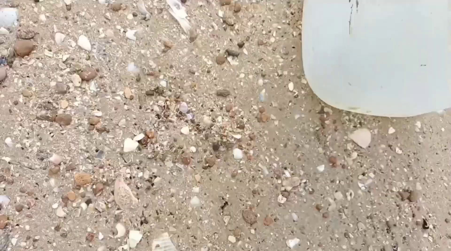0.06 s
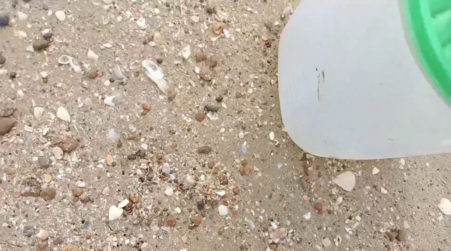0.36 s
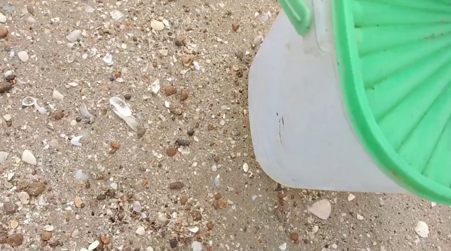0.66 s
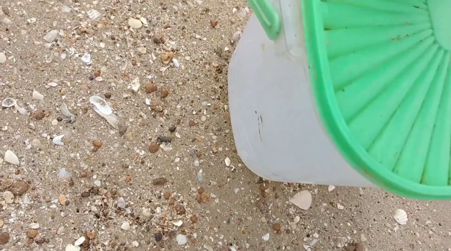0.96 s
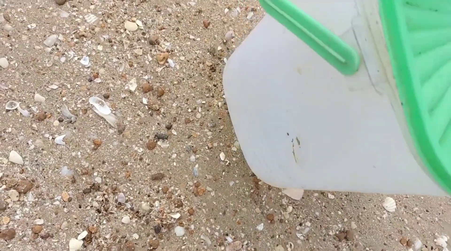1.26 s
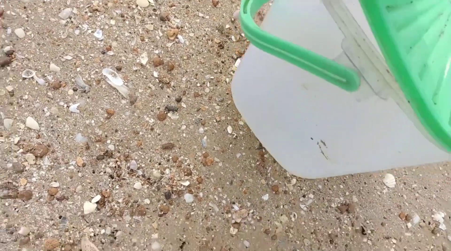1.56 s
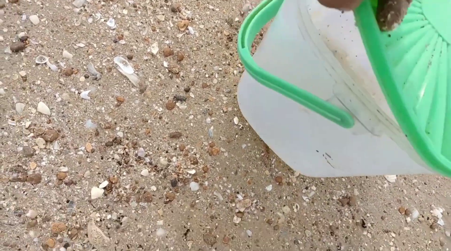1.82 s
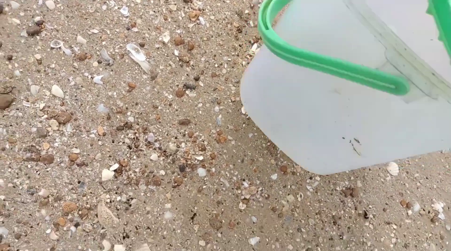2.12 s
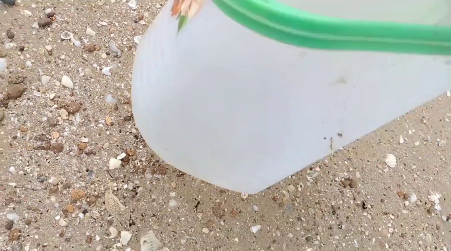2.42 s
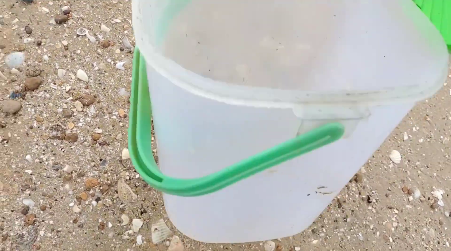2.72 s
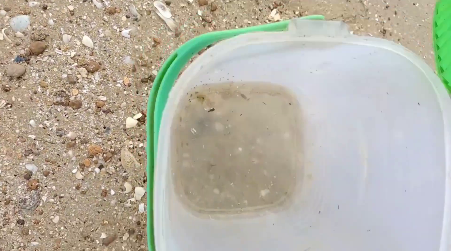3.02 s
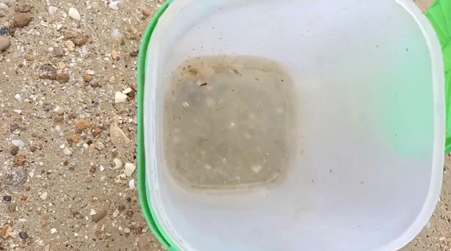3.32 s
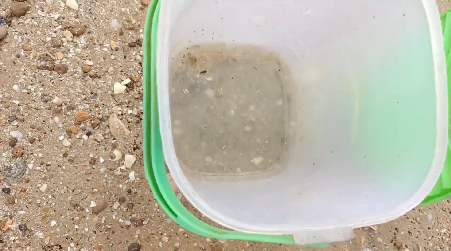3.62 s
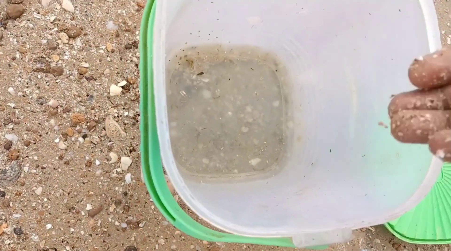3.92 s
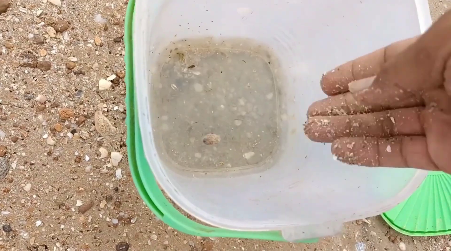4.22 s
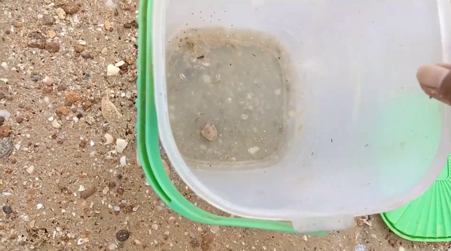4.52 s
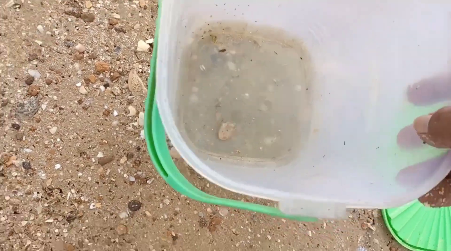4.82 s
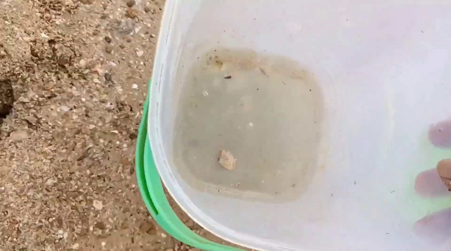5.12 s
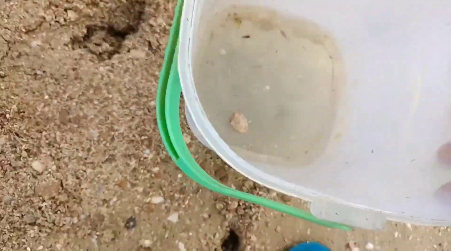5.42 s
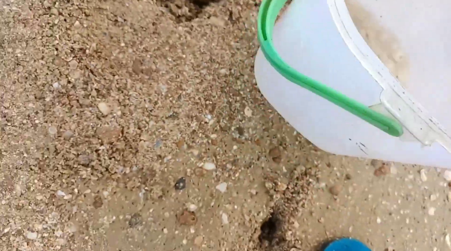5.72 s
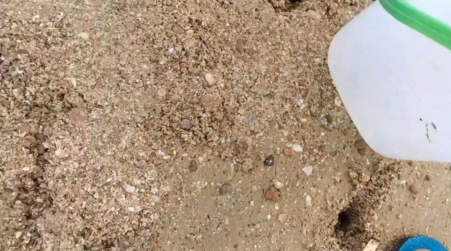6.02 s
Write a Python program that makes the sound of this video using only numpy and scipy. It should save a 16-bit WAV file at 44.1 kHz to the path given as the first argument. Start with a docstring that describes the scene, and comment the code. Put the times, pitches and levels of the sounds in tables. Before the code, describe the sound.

A plastic bucket scrapes and knocks on shell sand as its lid is pulled off and a wet lump plops into shallow water.

```python
"""On a beach of shell sand, a plastic bucket with a little water in it stands close to the microphone.
A sandy hand works the lid loose, drags the bucket over the grit, drops a wet lump into the water,
then grips the wall and tilts the bucket. Slipping grains and knocks ring its base, air cavity and walls;
the lid sticks and slips on the rim; drops leave ringing bubbles.
A light breeze rumbles underneath, with a faint hiss from the shore."""
import sys
import numpy as np
from scipy import signal
from scipy.fft import rfft, irfft, next_fast_len
from scipy.io import wavfile
from scipy.ndimage import uniform_filter1d

SR = 44100
rng = np.random.default_rng(int(sys.argv[2]) if len(sys.argv) > 2 else 0)


def log_audio(samples):
    """Write samples as a 16-bit WAV file to the path given in sys.argv[1]."""
    # one column per channel
    frames = np.atleast_2d(samples).T
    # limit to full scale, then quantise
    limited = np.clip(frames, -1, 1)
    pcm = np.round(limited * 32767).astype(np.int16)
    wavfile.write(sys.argv[1], SR, pcm)


N = 271656
TIME = np.arange(N) / SR
RING_TIME = TIME[:SR // 4]

# bucket modes with lid on, open, gripped by the wall: pitch_hz, level_db, t60_s
CLOSED_MODES = [(87.5, -14, 0.075), (163, -1.5, 0.073), (244.7, -1.5, 0.1), (302.3, -6, 0.14),
                (380, -2.5, 0.029), (455.2, -1, 0.083), (571, -3, 0.017), (929, -4, 0.097),
                (1080, -3.5, 0.025), (1150, -3, 0.052), (1444, -3.5, 0.11), (1516, 0, 0.03),
                (1786, -5, 0.073), (2100, -1.5, 0.017)]
OPEN_MODES = [(91, 0.5, 0.038), (113.6, -4.5, 0.058), (169, 0, 0.074), (351, 2, 0.093), (394.6, -1, 0.091),
              (464, -1.5, 0.05), (838, -9, 0.02), (1011, -28, 0.03), (1206, -5, 0.18), (1440, 0, 0.025),
              (1533, -0.5, .065), (1694, -6, 0.028), (1826, -13, 0.056), (2104, -12, .04),
              (2140, -19, 0.062)]
GRIPPED_MODES = [(165.5, 6.5, 0.13), (384, 0.5, 0.056), (424.8, 1, 0.099), (459.3, -0.5, 0.092),
                 (837, -7, 0.024), (990, -23, 0.021), (1180, -8.5, 0.12), (1417, -5.5, 0.062),
                 (1510, 0.5, 0.033), (1660, -5.5, 0.026), (1930, -6.5, .03), (2350, -4, 0.024)]
# bucket states (closed, open, gripped): start_s, modes
STATES = [(0, CLOSED_MODES), (2.42, OPEN_MODES), (4.25, GRIPPED_MODES)]
# bands of base, air cavity, walls, grit: low_hz, high_hz, dense_t60_s, dense_over_modes_db
PARTS = [(118.4, 254, 0.087, -6), (295.4, 562, 0.066, -11), (900, 2570, 0.061, -7.5),
         (2400, 15500, 0.084, 0)]
# grit spectrum: freq_hz, level_db
GRIT_COLOUR = [(1300, -19.5), (2100, -0.5), (2700, 1.5), (4000, -2), (6000, -3.5), (9000, -8), (12000, -5),
               (15500, -8.5)]
# hand position on the bucket: time_s, left_over_right_db
HAND_PAN = [(0, -1.5), (1.2, 2), (2.2, 0), (2.8, 2.5), (3.05, 1), (3.5, -1), (3.8, -0.5), (4.7, 0.5),
            (5.5, 0), (6.16, -3.5)]
# lid stick-slip on the rim: time_s, slips_per_s, level_db
LID_SLIPS = [(2.25, 200, -49), (2.275, 330, -33), (2.30, 354, -37.5), (2.316, 268, -23), (2.338, 340, -34),
             (2.36, 330, -44), (2.40, 390, -74)]


def from_db(db):
    """Decibels to gain."""
    return 10 ** (np.asarray(db) / 20)


def unit_rms(x):
    """Scale to rms 1."""
    return x / np.sqrt(np.mean(x ** 2) + 1e-20)


def unit_hit(x):
    """Scale to the energy of 20 ms at rms 1."""
    return unit_rms(x) * np.sqrt(SR / 50 / x.shape[-1])


def evened(x):
    """Hold the running rms at 1, keeping the grain."""
    return x / np.sqrt(np.abs(uniform_filter1d(np.mean(x ** 2, axis=0), size=1000)) + 1e-9)


def in_time(rows):
    """Curve columns, per sample."""
    times_s, *columns = np.transpose(rows)
    return [np.interp(TIME, times_s, column) for column in columns]


def bucket_state():
    """Index into STATES, per sample."""
    return np.searchsorted([start_s for start_s, _ in STATES], TIME, side="right") - 1


def add(out, start_s, sound):
    """Mix in at start_s."""
    at = max(int(start_s * SR), 0)
    out[:, at:at + sound.shape[-1]] += sound[..., :max(N - at, 0)]


def panned(x, pan_db):
    """Lean left by pan_db."""
    return x * from_db(np.array([[1], [-1]]) * pan_db / 2)


def band(x, low_hz, high_hz, order=2):
    """Causal band-pass."""
    sos = signal.butter(order, [low_hz, min(high_hz, .45 * SR)], "band", fs=SR, output="sos")
    return signal.sosfilt(sos, x + 1e-18)


def lowpass(x, cutoff_hz):
    """Causal two-pole low-pass."""
    return signal.sosfilt(signal.butter(2, cutoff_hz, fs=SR, output="sos"), x)


def coloured(x, colour):
    """Filter by rows of freq_hz, level_db."""
    size = next_fast_len(x.shape[-1])
    hz, db = np.transpose(colour)
    gain = from_db(np.interp(np.log(np.fft.rfftfreq(size, 1 / SR) + 1), np.log(hz), db))
    return irfft(rfft(x, size) * gain, size)[..., :x.shape[-1]]


def fade(t60_s):
    """Exponential decay."""
    return from_db(-60 * RING_TIME / t60_s)


def stroke(start_s, rise_s, length_s, sag_db_per_s=18, release_db_per_s=365):
    """Gain of one stroke: swell, slow sag, release."""
    t = np.maximum(TIME - start_s, 0)
    swell = np.minimum(t / rise_s, 1) ** 1.67
    return swell * from_db(-sag_db_per_s * t - release_db_per_s * np.clip(t - length_s, 0, .5))


def drift(rate_hz):
    """Smooth random curve, rms 1."""
    knots = rng.standard_normal(N // 8)
    return unit_rms(np.interp(TIME * rate_hz, np.arange(len(knots)), knots))


def noise(size, correlation=0.):
    """Stereo white noise, rms 1."""
    mid, side = rng.standard_normal((2, size))
    side = side * np.array([[1], [-1]])
    return unit_rms(np.sqrt(1 + correlation) * mid + np.sqrt(1 - correlation) * side)


def shore(level_db=-68):
    """Faint hiss of the far shore."""
    colour = [(100, 19), (400, 4), (800, 2), (1600, 6.5), (3500, -3), (7000, -4.5), (10000, 1.5),
              (15500, 0)]   # freq_hz, level_db
    return from_db(level_db) * unit_rms(coloured(noise(N, 0.2), colour))


def breeze():
    """Wind rumbles on the microphone."""
    gusts = [(0, -49.5), (.55, -49), (.95, -53.5), (1.9, -55.5), (3.2, -55.5), (3.9, -52.5), (4.25, -60.5),
             (5.2, -56.5), (5.55, -52.5), (6.16, -57)]   # time_s, level_db
    colour = [(20, -8), (40, 2.5), (80, 2), (150, -1.5), (220, -13), (400, -23), (900, -33), (3000, -92.5)]   # freq_hz, level_db
    level_db, = in_time(gusts)
    return from_db(level_db) * unit_rms(coloured(noise(N, 0.86), colour))


def sand_scuffs(half_width_hz=0.71 * 300, sink_octaves_per_s=1.47):
    """Sand slides under the tipping bucket, then a shoe scuffs the sand close by: a noise band that sinks as
    each slide slows."""
    slides = [(5.461, 0.012, 0.065, 1007, -48.5), (5.632, 0.012, 0.017, 1103, -58),
              (5.712, .03, 0.064, 763, -52.5), (5.822, 0.017, 0.076, 900, -49.5)]   # start_s, rise_s, length_s, centre_hz, level_db
    hump = unit_rms(lowpass(noise(N, 0.6), half_width_hz))
    carriers = 0
    for start_s, rise_s, length_s, hz, db in slides:
        centre_hz = hz * 2 ** (-sink_octaves_per_s * np.maximum(TIME - start_s, 0))
        phase = 2 * np.pi * np.cumsum(centre_hz) / SR
        carriers += from_db(db) * stroke(start_s, rise_s, length_s) * np.cos(phase)
    return np.sqrt(2) * hump * carriers


def water_drops(t60_cycles=40, chirp=1.4, slap_db=-11, spray_db=-18):
    """Each drop slaps the water, throws spray and leaves a bubble of rising pitch."""
    drops = [(3.9694, 1010, -39), (3.9923, 1084, -22), (3.9995, 1840, -28), (4.0062, 1150, -22.5),
             (4.0321, 1030, -36), (4.1249, 1080, -31.5), (4.1253, 581, -36), (4.1587, 1510, -38.5)]   # start_s, bubble_hz, level_db
    out, t = np.zeros((2, N)), RING_TIME
    for start_s, hz, db in drops:
        phase = 2 * np.pi * hz * t * (1 + chirp * t)
        bubble = np.sin(phase) * fade(t60_cycles / hz) * np.minimum(t * hz, 1)
        slap = unit_hit(band(noise(len(t), 0.13) * fade(0.059), 323, 1750, order=3))
        spray = unit_hit(band(noise(len(t)) * fade(0.063), 3300, 11000, order=1))
        add(out, start_s, from_db(db) * (bubble + from_db(slap_db) * slap + from_db(spray_db) * spray))
    return out


def lid_flex(level_db=-34):
    """The lid bends as it is pulled off and shudders in the bass."""
    shudder = evened(band(noise(N, 0.91), 68, 190, order=4))
    return from_db(level_db) * stroke(LID_SLIPS[0][0], rise_s=0.015, length_s=0.075) * shudder


def lid_judder(wobble=0.049, flutter_db=1.0, wall_hz=1457, width_hz=30, wall_db=-11):
    """The lid sticks and slips on the rim, faster as it comes free; the wall sings along."""
    slips_per_s, db = in_time(LID_SLIPS)
    phase = 2 * np.pi * np.cumsum(slips_per_s * (1 + wobble * drift(120))) / SR
    wall = unit_rms(band(rng.standard_normal(N), wall_hz - width_hz / 2, wall_hz + width_hz / 2))
    sliding = (TIME > LID_SLIPS[0][0]) & (TIME < LID_SLIPS[-1][0])
    gain = sliding * from_db(db - flutter_db * drift(110))
    return gain * (np.sqrt(2) * np.sin(phase) + from_db(wall_db) * wall)


def sand_grains(per_s, size_db, clump_db, correlation):
    """Grains catch and slip: clicks of uneven size, in clumps."""
    slips = rng.random(N) < per_s / SR
    sizes = from_db(size_db * np.minimum(rng.exponential(1, N), 4))
    return unit_rms(slips * sizes * from_db(clump_db * drift(170)) * noise(N, correlation))


def shell_ticks(per_s, low_hz, high_hz, t60_s, size_db, skew_hz_per_rad):
    """Shell bits collide, each ringing briefly at its own pitch."""
    start, pitch, size, side, lean = rng.random((int(per_s * N / SR), 5)).T[..., None]
    t = RING_TIME[:SR // 50]
    hz = low_hz + (high_hz - low_hz) * pitch
    envelopes = from_db(size_db * np.minimum(-np.log(1 - size), 3.5) - 60 * t / t60_s)
    at = ((start * N).astype(int) + np.arange(len(t))).ravel()
    skew_rad = (2 * side - 1) * hz / skew_hz_per_rad
    channels = []
    for sign in (1, -1):
        ticks = envelopes * (1 + sign * (lean - .5)) * np.sin(2 * np.pi * hz * t + sign * skew_rad)
        channels.append(np.bincount(at, ticks.ravel(), N)[:N])
    return unit_rms(np.array(channels))


def bucket_ring(modes, part, spot_hz=None, vary_db=4.5, spot_db=9, spot_width_hz=170):
    """Modes of base, cavity or walls (part 0, 1, 2), boosted near the struck spot's pitch."""
    out = np.zeros((2, len(RING_TIME)))
    for hz, db, t60_s in modes:
        if np.searchsorted([270, 700], hz) == part:
            boost_db = spot_db * np.exp(-((hz - spot_hz) / spot_width_hz) ** 2) if spot_hz else 0
            # higher modes reach the two microphone ports out of step
            skew_rad = rng.choice([-1, 1]) * hz / 1300 / 2 * np.array([[1], [-1]])
            envelope = fade(t60_s) * np.minimum(RING_TIME * hz, 1)
            swing = unit_hit(np.sin(2 * np.pi * hz * RING_TIME + skew_rad) * envelope)
            out += from_db(db + boost_db + vary_db * rng.normal()) * rng.choice([-1, 1]) * swing
    return unit_hit(out)


def stroke_drive(waver_db=2.37, still_from_s=4.06, still_to_s=4.55):
    """Drive in dB on base, cavity, walls and grit from unsteady strokes and trickling sand."""
    # hand rubs and bucket drags: start_s, rise_s, length_s, cavity_db, walls_db, grit_db
    strokes = [(0.0, 0.0033, .13, -66, -56.5, -50.5), (0.135, .04, 0.24, -63, -55, -52),
               (0.383, 0.16, 0.52, -59, -56.5, -58), (0.95, .035, 0.11, -53.5, -57, -59),
               (1.06, 0.064, 0.13, -46.5, -40, -44.5), (1.2, 0.042, .11, -50, -44.5, -49),
               (1.333, 0.033, .23, -46.5, -44, -49), (1.531, 0.011, 0.31, -57, -52, -53),
               (1.63, 0.039, 0.065, -52.5, -47, -51), (1.84, 0.062, 0.097, -43.5, -36, -42.5),
               (1.96, .03, 0.15, -68, -79, -69.5), (2.073, 0.1, 0.18, -36, -31, -37),
               (2.238, 0.023, 0.12, -37, -42.5, -44.5), (2.402, 0.019, 0.047, -53.5, -66, -58.5),
               (2.482, 0.01, 0.038, -41.5, -56.5, -59.5), (2.58, 0.026, 0.047, -45.5, -49, -48.5),
               (2.655, 0.028, 0.064, -39, -42.5, -50.5), (2.791, 0.06, 0.083, -42.5, -42.5, -46.5),
               (2.897, 0.044, 0.1, -40.5, -44, -53.5), (2.965, 0.045, 0.083, -33, -41, -45),
               (3.108, 0.032, 0.088, -80, -57, -65.5), (3.368, 0.031, 0.028, -36.5, -40, -49.5),
               (3.428, 0.021, 0.08, -42.5, -40, -48), (3.563, 0.014, .055, -45.5, -53, -53.5),
               (3.668, 0.018, 0.04, -42, -46, -54), (3.73, 0.028, 0.039, -43, -43.5, -53),
               (3.91, 0.047, 0.12, -57.5, -62, -65), (4.544, 0.033, 0.21, -39.5, -54.5, -64),
               (4.742, 0.067, 0.17, -49, -51, -57.5), (4.893, 0.02, 0.097, -49, -65.5, -84),
               (5.008, 0.52, 0.49, -70, -74, -56.5), (5.445, 0.075, 0.085, -33.5, -53, -54.5),
               (5.631, 0.018, 0.22, -73, -53.5, -51.5), (5.82, 0.019, 0.087, -38, -40, -46.5),
               (5.939, 0.021, 0.11, -39, -49, -55), (6.045, 0.039, 0.084, -48.5, -56, -54)]
    trickle_db = [-79.5, -79, -72]   # loose sand: cavity_db, walls_db, grit_db
    base_over_cavity_db = [-0.5, -3.5, -12]   # closed_db, open_db, gripped_db
    envelopes = np.array([stroke(*row[:3]) for row in strokes])
    handled = (TIME < still_from_s) | (TIME > still_to_s)
    power = from_db(np.array(strokes)[:, 3:]).T ** 2 @ envelopes ** 2
    power += handled * from_db(trickle_db)[:, None] ** 2
    cavity_db, walls_db, grit_db = 10 * np.log10(power + 1e-12) + waver_db * drift(51)
    base_db = cavity_db + np.take(base_over_cavity_db, bucket_state())
    return np.array([base_db, cavity_db, walls_db, grit_db])


def hollow_note(cavity_db, offset_db=-1.5, width_hz=36):
    """The rubbed open bucket hums on one narrow resonance that shifts as the hand bends the wall."""
    pitch_curves = [
        [(2.46, 359.3), (2.842, 418), (2.872, 377), (2.972, 395), (3.07, 385.3)],
        [(3.38, 436.5), (3.45, 408), (3.748, 377), (3.79, 401)],
        [(4.56, 381.4), (4.608, 403.1), (4.754, 373), (4.788, 404), (5.02, 407)],
        [(5.46, 443.7), (5.512, 450.3), (5.56, 410)],
        [(5.83, 446.2), (6.12, 413)],
    ]   # one per spell of handling: time_s, pitch_hz
    hz, = in_time(np.concatenate(pitch_curves))
    swing = lowpass(rng.standard_normal((2, N)), width_hz / 2)
    phase = 2 * np.pi * np.cumsum(hz) / SR
    note = evened(unit_rms(swing[:1] * np.cos(phase) + swing[1:] * np.sin(phase)))
    lid_off = bucket_state() > 0
    return panned(lid_off * from_db(cavity_db + offset_db) * note, in_time(HAND_PAN)[0])


def rubbing(base_db, cavity_db, walls_db, grit_db):
    """Slipping grains drive the bucket's modes; sand hisses and shell bits tick."""
    cavity_share_db = [0, -4.5, -4.5]   # closed_db, open_db, gripped_db
    state = bucket_state()
    body_db = [base_db, cavity_db + np.take(cavity_share_db, state), walls_db]
    force = sand_grains(per_s=12000, size_db=2.0, clump_db=4.0, correlation=0.94)
    sand = sand_grains(per_s=18000, size_db=0.5, clump_db=-0.6, correlation=0)
    shells = shell_ticks(2800, 1900, 15500, t60_s=0.015, size_db=2.3, skew_hz_per_rad=1500)
    out = from_db(grit_db) * evened(coloured(sand + shells, GRIT_COLOUR))
    wall_ticks = shell_ticks(700, 950, 2314, t60_s=0.014, size_db=3.5, skew_hz_per_rad=1240)
    dense = [band(force, low_hz, high_hz, order=3) for low_hz, high_hz, _, _ in PARTS[:2]]
    dense.append(band(wall_ticks, 780, 2610))
    for part, (db, dense_db) in enumerate(zip(body_db, [-9, -8, -1.5])):
        modal = 0
        for k, (_, modes) in enumerate(STATES):
            response = bucket_ring(modes, part, vary_db=0.5)
            modal += signal.oaconvolve(force * (state == k), response, axes=1)[:, :N]
        out += from_db(db) * evened(unit_rms(modal) + from_db(dense_db) * unit_rms(dense[part]))
    return panned(out, in_time(HAND_PAN)[0])


def grain_catches(drive_db, per_s=15, offset_db=-6, spread_db=2, crack_db=1, low_hz=1150, high_hz=1760):
    """Grains catch and let go: random contact rows for knocks(), scaled by the drive."""
    when, size, pitch, chance = rng.random((160, 4)).T
    at = (when * N).astype(int)
    levels_db = drive_db[:, at] + offset_db + spread_db * np.minimum(-np.log(1 - size), 2)
    spot_hz = low_hz + (high_hz - low_hz) * pitch
    rows = np.column_stack([at / SR, levels_db.T, spot_hz, np.full(len(at), crack_db)])
    return rows[chance < per_s * N / SR / len(at)].tolist()


def knocks(catches, jolt_db=-13, spot_db=-3, snap_db=-2, crush_s=0.0008, pan_offset_db=-1.3):
    """Each contact gives a dry jolt and rings the bucket, with new mode strengths every time."""
    # knocks and snaps: start_s, base_db, cavity_db, walls_db, grit_db, spot_hz, crack_db
    contacts = [(0.3646, -69, -80, -41, -54.5, 1660, 10), (0.6063, -44.5, -43.5, -50, -56, 1440, -21),
                (0.6664, -49, -44, -49.5, -80, 1320, 13), (0.7368, -32.5, -39.5, -42, -81, 900, 7.5),
                (0.82, -53, -41, -33.5, -45, 1430, 10), (0.8233, -37.5, -33, -37, -60, 900, 1),
                (0.855, -45, -39.5, -41.5, -49, 905, -10), (1.003, -41.5, -40, -58, -78, 920, 0),
                (1.2778, -46, -47, -34.5, -45, 1510, -1), (1.4082, -43.5, -32, -32.5, -48.5, 950, 1.5),
                (2.205, -58, -50, -31.5, -46, 1050, 4), (2.229, -45, -55, -31.5, -36, 1050, -2),
                (2.372, -43, -58, -43.5, -46.5, 1470, -3), (2.613, -27.5, -37, -34.5, -40, 2100, -11),
                (2.6225, -28.5, -25.5, -33, -35.5, 1510, 5.5), (2.6726, -41, -39.5, -46, -65, 1120, 12),
                (2.884, -42, -37, -48.5, -67, 1450, 9), (2.9894, -55, -61, -35, -45, 1490, -6),
                (3.0038, -29.5, -31.5, -31, -35.5, 1640, -21), (3.4098, -60, -30.5, -35, -41.5, 1400, -2),
                (3.417, -41, -34, -38, -39.5, 1630, 3), (3.4483, -34.5, -44, -42, -47.5, 1500, 2),
                (3.4707, -38.5, -56, -37, -51, 1530, 0), (3.5801, -59, -46, -39.5, -45.5, 1530, -14),
                (3.591, -38.5, -49, -41, -47.5, 1520, 6), (3.694, -38.5, -47, -50, -63, 1500, -4),
                (3.7379, -55, -65, -39.5, -54.5, 1549, -3), (4.3328, -37, -31, -32, -34, 1150, 0.5),
                (4.3387, -35.5, -23, -29.5, -51, 1410, -3.5), (4.346, -36.5, -30.5, -38.5, -58, 1510, -9),
                (4.407, -48, -40, -42, -49.5, 1590, 7), (4.4759, -53, -35.5, -35, -48, 1230, -6),
                (4.5001, -62, -34.5, -35, -56, 1253, -5), (4.522, -67, -44, -53, -59, 1187, 2),
                (4.5673, -41.5, -50, -43.5, -50.5, 1920, -5), (4.63, -57, -44, -47, -56.5, 1560, -1),
                (4.6634, -51, -39, -56, -61.5, 1440, -5), (4.7219, -46, -46.5, -51.5, -58.5, 1508, -3),
                (5.8362, -47.5, -45, -40, -46.5, 1440, -20), (5.8722, -55, -29.5, -33.5, -57, 1260, 3),
                (5.906, -48, -38, -59, -69, 1420, 28)]
    out, size = np.zeros((2, N)), len(RING_TIME)
    impulse = signal.unit_impulse(size)
    jolts = [unit_hit(band(impulse, low_hz, high_hz, order=3)) for low_hz, high_hz, _, _ in PARTS[:2]]
    for start_s, *body_db, grit_db, spot_hz, crack_db in contacts + catches:
        modes = [modes for from_s, modes in STATES if from_s <= start_s][-1]
        spot = unit_hit(band(np.sin(2 * np.pi * spot_hz * RING_TIME) * fade(0.011), 590, 3600, order=1))
        cracks = [from_db(jolt_db) * jolt for jolt in jolts] + [from_db(spot_db) * spot]
        sound = 0
        for part, (db, crack) in enumerate(zip(body_db, cracks)):
            low_hz, high_hz, t60_s, dense_db = PARTS[part]
            dense = unit_hit(band(noise(size, 0.35) * fade(t60_s), low_hz, high_hz, order=3))
            ring = bucket_ring(modes, part, spot_hz) + from_db(dense_db) * dense
            sound += from_db(db) * unit_hit(ring + from_db(crack_db) * crack)
        # trapped grains snap at once, then rattle briefly
        snap = from_db(crack_db + snap_db) * unit_hit(fade(0.01))
        rattle = unit_hit(fade(PARTS[-1][2]))
        envelope = (snap + rattle) * np.minimum(RING_TIME / crush_s, 1)
        sound += from_db(grit_db) * unit_hit(coloured(noise(size), GRIT_COLOUR) * envelope)
        pan_db = pan_offset_db + np.interp(start_s, *np.transpose(HAND_PAN))
        add(out, start_s, panned(sound, pan_db))
    return out


def scene():
    """The bucket close by, in the open air."""
    drive_db = stroke_drive()
    rubbed = rubbing(*drive_db) + hollow_note(cavity_db=drive_db[1])
    handling = rubbed + lid_judder() + lid_flex() + water_drops() + sand_scuffs()
    background = breeze() + shore()
    return background + handling + knocks(grain_catches(drive_db))


def channel_colour(x, resonances):
    """Treble peaks and notches of one channel."""
    for hz, width_hz, db in resonances:
        middle = -2 * np.cos(2 * np.pi * hz / SR)
        alpha, gain = np.tan(np.pi * width_hz / SR), from_db(db / 2)
        numerator = [1 + alpha * gain, middle, 1 - alpha * gain]
        denominator = [1 + alpha / gain, middle, 1 - alpha / gain]
        x = signal.lfilter(numerator, denominator, x)
    return x


def record(dry, cutoff_hz=15900):
    """Each channel has its own treble colour; a steep low-pass cuts the top."""
    # treble peaks and notches per channel: centre_hz, width_hz, gain_db
    left_colour = [(6680, 1920, -16), (9660, 2260, 14), (13230, 7700, -9)]
    right_colour = [(6910, 2230, 10), (10600, 2140, -31.5), (12570, 1500, 3.5)]
    stereo = np.array([channel_colour(dry[0], left_colour), channel_colour(dry[1], right_colour)])
    return signal.sosfilt(signal.ellip(10, .2, 80, cutoff_hz, fs=SR, output="sos"), stereo)


dry = scene()
out = record(dry)
log_audio(out)
```